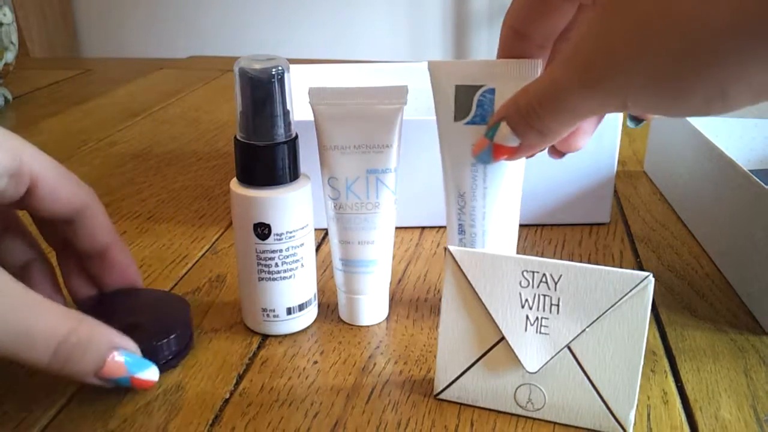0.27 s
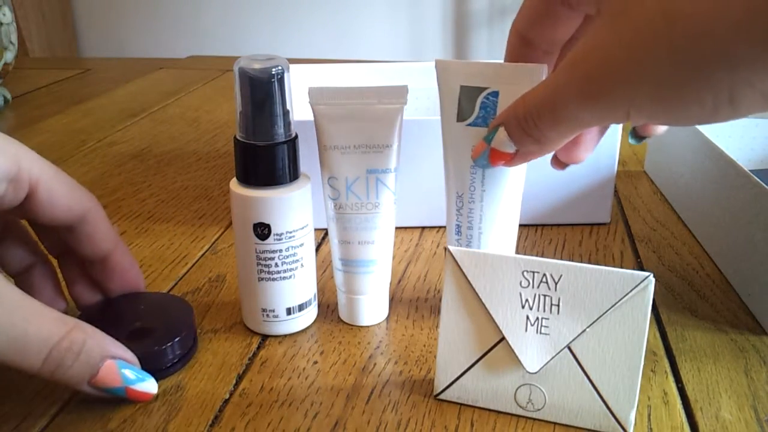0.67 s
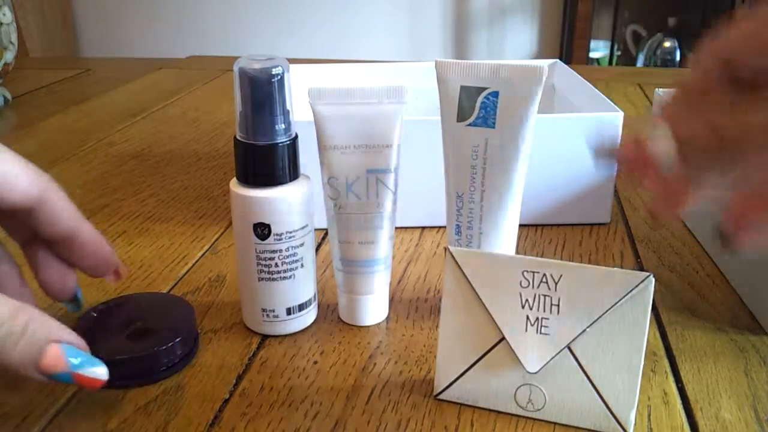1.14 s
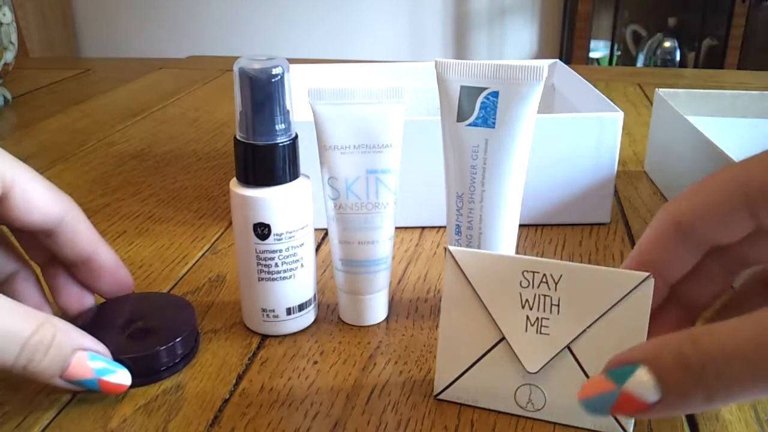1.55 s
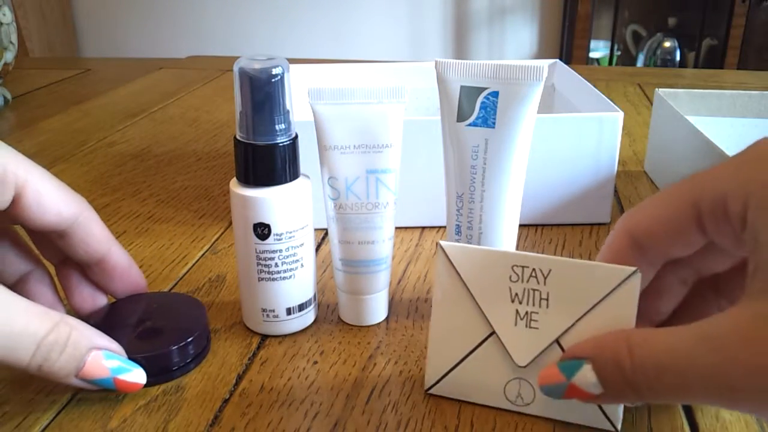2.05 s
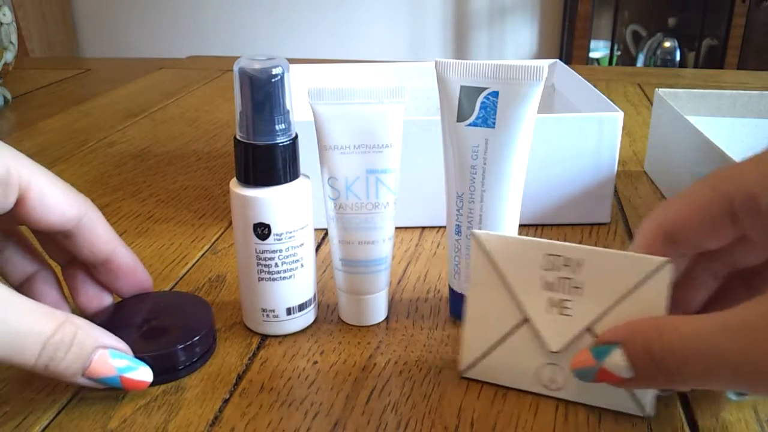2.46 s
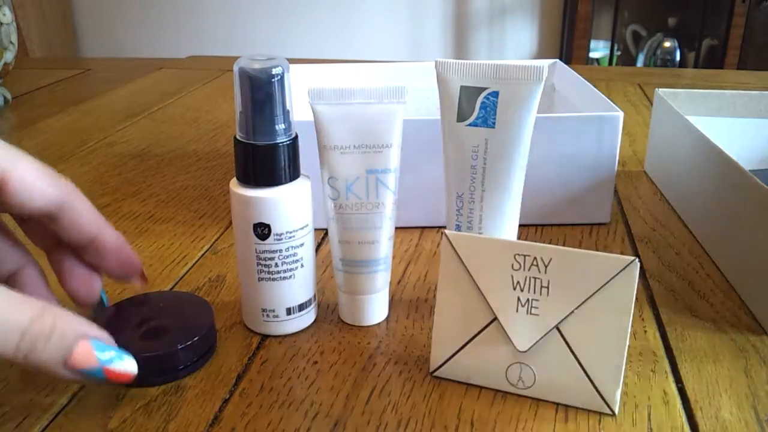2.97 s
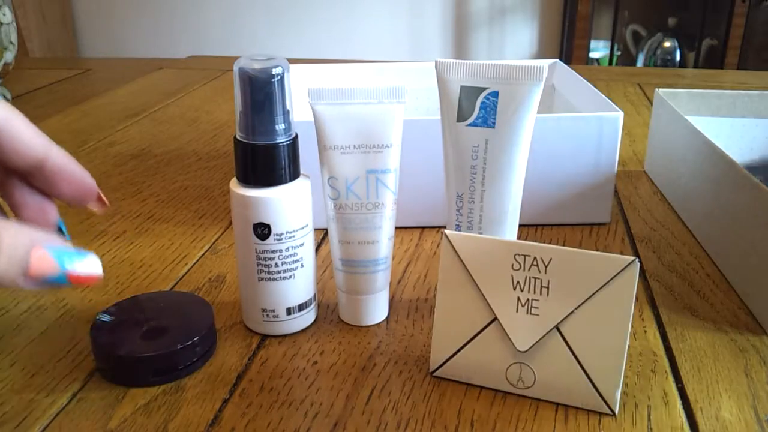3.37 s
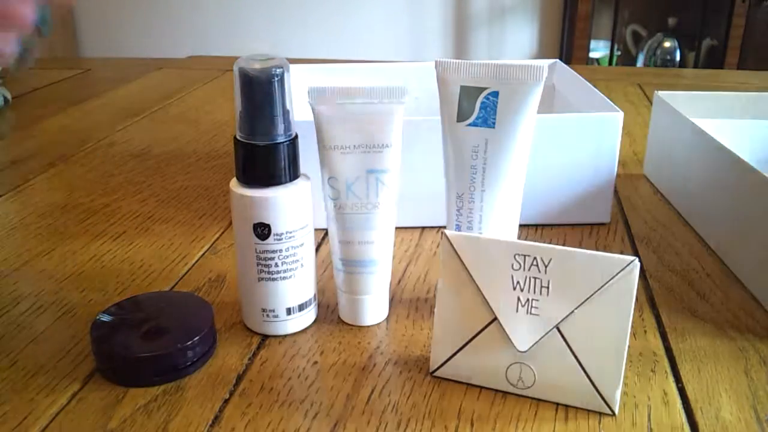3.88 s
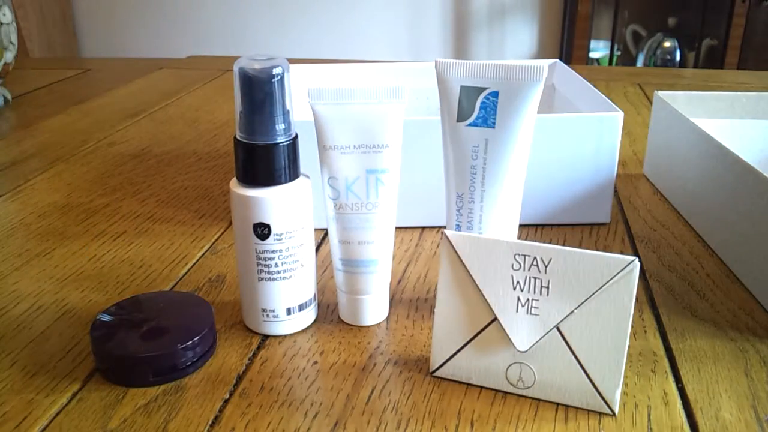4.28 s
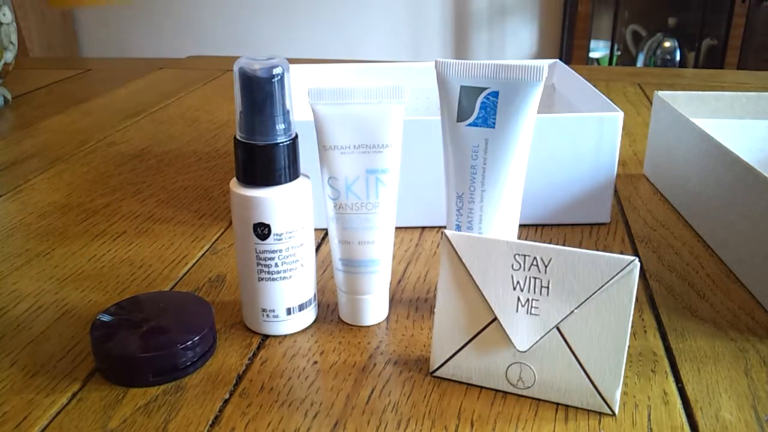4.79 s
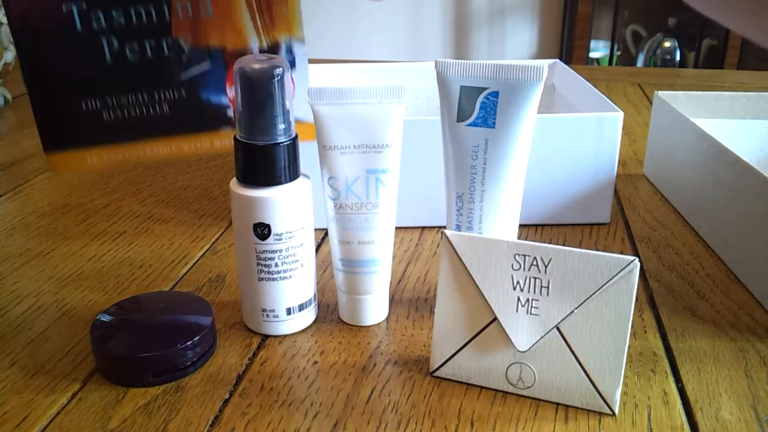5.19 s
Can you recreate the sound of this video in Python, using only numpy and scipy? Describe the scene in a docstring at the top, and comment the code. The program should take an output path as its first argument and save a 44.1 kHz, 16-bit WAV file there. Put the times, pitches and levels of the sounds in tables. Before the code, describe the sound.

Close to the microphone in a small, quiet room, a tube's hard cap clicks once against a wooden table. Very soft finger rubbing and the slight scrape of a card packet come next. Hollow cardboard knocks and sliding build to a sharp clack, the loudest moment, as a book is taken from a box. Light ticks and faintly squeaky rubs on the cover end it, over steady low air noise and hiss.

```python
"""A plastic tube is tapped down on a wooden table, its cap ringing briefly in a small, quiet room.
Fingers brush over cosmetics and a card packet is shifted. Then a book is fetched from a cardboard box
with hollow knocks, sliding, faint squeaks and one hard clack that makes the camera's limiter dip.
Each hit is a few dying tones plus a burst of noise; each slide is thousands of tiny slips.
A low murmur of air and a thin hiss lie under it all."""
import sys
import numpy as np
from scipy import signal
from scipy.fft import rfft, irfft
from scipy.io import wavfile
from scipy.ndimage import uniform_filter1d

SR = 44100
rng = np.random.default_rng(int(sys.argv[2]) if len(sys.argv) > 2 else 0)


def wav_record(signal):
    """Record a signal, one row per channel, as 16-bit PCM in the file named by sys.argv[1]."""
    frames = np.transpose(np.atleast_2d(signal))
    bounded = np.clip(frames, -1, 1)
    # unit amplitude maps onto the largest positive 16-bit level
    quanta = np.round(bounded * 32767).astype(np.int16)
    wavfile.write(sys.argv[1], SR, quanta)


N = 240034

# the room's murmur and hiss on each side: (frequency [Hz], level [dB])
AIR_LEFT = [(20, -41), (60, -11.5), (120, -8), (165, 1.5), (280, 4), (450, -7.5), (750, -13), (1400, -15.5),
            (2600, -17.5), (6200, -23.5), (9000, -19.5), (12000, -14.5), (14400, -23.5)]
AIR_RIGHT = [(20, -16), (60, -22.5), (120, -12.5), (170, -6), (300, -4), (650, -10), (1400, -12.5),
             (2600, -15), (4700, -16.5), (5500, -11.5), (9000, -16), (12000, -12.5), (14400, -18.5)]
# how alike that noise is on the two sides: (frequency [Hz], likeness [0-1])
AIR_LIKENESS = [(60, 0.03), (130, 0.24), (290, 0.82), (640, 0), (1400, 0.23), (3100, 0.016)]
# how long the room rings: (frequency [Hz], time to fade by 60 dB [s])
ROOM_FADE = [(200, 0.34), (500, 0.15), (2000, 0.34), (5000, 0.32), (12000, 0.29)]
# echoes from nearby boxes and walls: (delay [s], level [dB])
NEAR_ECHOES = [(.0011, -63), (.0024, -26.5), (.0085, -29), (0.0119, -20.5), (0.0149, -20)]
# what each kind of source sends into the room: (frequency [Hz], level [dB])
RUB_TO_ROOM = [(1000, -8), (12000, -7.5)]
TICK_TO_ROOM = [(2000, -5.5), (4500, -12), (12000, 0)]
KNOCK_TO_ROOM = [(400, -5.5), (1300, -6), (4000, 0), (12000, -11)]
TAP_TO_ROOM = [(300, -5), (1100, 1), (1500, -3.5), (2100, -6), (3000, -11), (3700, -14), (5000, -13),
               (6200, -2), (8000, -7), (12000, -9)]
CLACK_TO_ROOM = [(1000, -9.5), (1650, -7.5), (2250, -14), (2900, -9.5), (3550, -13), (4100, -6),
                 (5000, -14), (6500, -17), (12000, -15)]
# each microphone's tone for direct sound and for sound from all sides: (frequency [Hz], level [dB])
MIC_DIRECT_LEFT = [(100, -7), (400, 3.5), (700, -0.5), (2200, 2), (3400, -4.5), (4600, -6.5), (5700, -23),
                   (7200, -5), (9500, -1), (11600, 7.5), (14500, -1)]
MIC_DIRECT_RIGHT = [(100, -8.5), (400, -2.5), (700, 1.5), (2200, 3), (3400, 1), (4500, 3.5), (5050, 9),
                    (5700, 5.5), (6500, 3.5), (9000, -3), (11600, -9.5), (14500, -8)]
MIC_ROOM_LEFT = [(100, -11), (400, 10.5), (700, -3), (2200, 3), (3400, -2), (4600, -10.5), (5900, -10),
                 (7200, -4.5), (9500, -1.5), (11600, 9), (14500, -1)]
MIC_ROOM_RIGHT = [(100, -5.5), (400, 0), (2200, 4), (4000, 4.5), (5050, 5), (5700, 6.5), (6500, -4.5),
                  (9000, 1), (11600, -4), (14500, -8)]
# how far the right microphone trails the left: (frequency [Hz], phase lag [rad])
RIGHT_LAG = [(100, 2.57), (300, 2.69), (1000, 2.15), (2200, 1.78), (5000, 2.08), (14000, 3.05)]

# fingers on the tube and on the packet, packet on the table, hand on the book's cover:
# (start [s], rise [s], fall [s], scrape level [dB], hiss over the scrape [dB])
TUBE_RUBS = [(.8, 0.23, 0.22, -64, 1), (1.05, 0.23, 0.21, -62, -26)]
FINGER_RUBS = [(1.95, 0.33, 0.28, -62.5, -20)]
PACKET_RUBS = [(2.37, .13, 0.16, -49.5, -9)]
COVER_RUBS = [(4.375, 0.03, 0.07, -52, 4.5), (4.44, 0.056, 0.14, -61.5, 10), (4.52, .13, 0.054, -52, 7.5),
              (4.66, 0.14, .3, -55, -18)]
# same columns: the book sliding in its box and, at 3.483 s, the clack's noisy tail dying away in the room
BOOK_RUBS_AND_CLACK_TAIL = [(3.25, 0.16, 0.24, -38.5, -2.5), (3.46, 0.043, 0.14, -28, 5.5),
                            (3.483, .006, 0.069, -21, 3), (3.55, 0.045, 0.073, -44, 5.5),
                            (3.66, 0.075, 0.026, -46, 6), (3.72, 0.15, .6, -56, -2)]
# the pitch ranges that each of those sounds brings out: (frequency [Hz], width [Hz], level [dB])
TUBE_BANDS = [(1400, 500, -5), (2980, 240, -5)]
FINGER_BANDS = [(5700, 560, -9), (6600, 480, -5), (7800, 400, 5)]
PACKET_BANDS = [(330, 150, -7), (517, 220, 1), (900, 330, -2), (1940, 240, -7.5), (2960, 1800, -9),
                (4960, 300, -8)]
COVER_BANDS = [(1570, 360, -2), (2000, 1100, 3.5), (3220, 800, 5), (3750, 340, 2)]
BOOK_BANDS = [(1050, 300, -33), (1270, 1030, 8), (2500, 900, -21), (3280, 1140, 10)]
# the hiss of slipping fibres: (frequency [Hz], level [dB])
RUB_HISS = [(1500, -39.5), (3200, 10.5), (5000, 4.5), (7000, 3.5), (9500, 1), (12500, 3), (14500, -2),
            (16000, -2)]
# glossy card singing as it slips:
# (start [s], rise [s], fall [s], level [dB], starting pitch [Hz], glide [Hz/s], width [Hz])
COVER_SQUEAKS = [ (3.321, 0.015, 0.035, -46, 4270, -3000, 220), (4.52, 0.16, 0.16, -57, 3090, 546, 95),
                 (4.56, .07, .05, -62, 5150, 900, 190)]

# the natural tones of the cardboard, the table top, the tube's cap and the hard edge that clacks:
# (frequency [Hz], level [dB], time to fade by 60 dB [s])
CARD_TONES = [(722, -2, 0.034), (962, 7, 0.016), (1096, 2.5, 0.025), (1320, 4.5, 0.018), (1596, -6, 0.021),
              (1874, -3, 0.015), (2460, -28, 0.031)]
TABLE_TONES = [(251, -17.5, 0.12), (338.5, -2, 0.042), (419, 4, 0.028), (543, 7, 0.02), (618, -14, 0.063)]
CAP_TONES = [(343, -16, 0.032), (678, -7.5, 0.037), (1000, -2.5, 0.016), (1400, -1, 0.0091),
             (1950, -1, 0.011), (2320, 1.5, 0.016), (2910, -0.5, 0.014), (3770, 8.5, 0.009),
             (4670, 4, 0.0099), (5320, 5.5, 0.0074), (7750, 1, 0.0062), (11260, -1, 0.0053)]
EDGE_TONES = [(970, -13, 0.019), (1210, -21, 0.013), (2238, -4, 0.019), (2965, -9, 0.01),
              (3450, -5, 0.0081), (4850, 3, 0.0066), (5630, -2.5, 0.0081)]
# nails and edges catching: (time [s], level [dB], pitch [Hz], pitched share [0-1], contact time [s])
NAIL_TICKS = [ (0.256, -52, 2300, 0.3, .0005), (2.753, -53, 2770, .85, .0003),
              (3.238, -35, 2290, 0.2, 0.00018), (3.278, -43, 2250, 0.06, 0.00045),
              (3.407, -37.5, 6360, 0.9, 0.0012), (3.435, -37.5, 5650, 0.96, 0.0008),
              (3.895, -43, 4080, 0.8, 0.0002), (3.911, -55.5, 4200, 0.1, 0.00022),
              (4.387, -47, 1630, 0.34, 0.00061), (4.420, -43, 4840, 0.2, 0.0002),
              (4.496, -48, 5360, 0.6, 0.00037), (4.616, -50.5, 5760, .3, 0.0012)]
# blunt knocks of card and book and, at 0.332 s, a low room boom just after the tube's tap:
# (time [s], card level [dB], low thud over the card [dB], thud pitch [ratio], contact time [s])
KNOCKS_AND_BOOM = [ (0.256, -54.5, -1, 0.92, .001), (0.332, -56, 16.5, 0.84, 0.0028),
                   (2.37, -49, 5, 0.97, 0.00079), (2.555, -53.5, 3, 1.2, 0.00082),
                   (2.753, -54, -1, 1.06, 0.0009), (3.215, -29.5, -14, 0.9, 0.0014),
                   (3.245, -48.5, 7, 0.78, 0.0044), (3.257, -45.5, 6, .93, 0.001),
                   (3.279, -50.5, 10, 0.75, .003), (3.371, -27.5, -0.5, 1.02, 0.002),
                   (3.384, -37.5, -4, 0.96, 0.00072), (3.465, -32.5, -8, 1.06, 0.0013),
                   (3.720, -32, 0.5, 1.26, 0.0072), (3.730, -37.5, 1, 1.07, .001),
                   (3.750, -53, -2.5, 0.77, 0.0007), (4.083, -55.5, 1, 1.2, 0.0094)]


def amp(db):
    """Turns decibels into a number to multiply by."""
    return 10 ** (np.asarray(db) / 20)


def unit(x):
    """Scales a sound to an average strength (rms) of one."""
    return x / np.sqrt(np.mean(x ** 2) + 1e-20)


def unit_hit(x):
    """Gives a hit the same energy as 10 ms of sound at an rms of one."""
    return x * np.sqrt(.01 * SR / np.sum(x ** 2))


def look_up(points, hz):
    """Reads between the rows of a table, with every octave equally wide."""
    table_hz, value = np.transpose(points)
    return np.interp(np.log(hz + 1), np.log(table_hz + 1), value)


def add(mix, time_s, sound):
    """Mixes a sound in at the given time."""
    part = mix[:, round(time_s * SR):][:, :sound.shape[-1]]
    part += sound[..., :part.shape[1]]


def panned(sound, pan_db):
    """Makes a sound pan_db louder on the left than on the right."""
    return sound * amp([[pan_db / 2], [-pan_db / 2]])


def colour(x, points, size=2048):
    """Shapes a sound's tone by a table, without smearing it earlier in time."""
    log_gain = np.log(amp(look_up(points, abs(np.fft.fftfreq(size, 1 / SR)))))
    taps = np.fft.ifft(np.exp(np.conj(signal.hilbert(log_gain)))).real
    return signal.oaconvolve(x, taps[:size // 2])[:len(x)]


def room_air():
    """The room's air murmurs low, with a thin steady hiss on top."""
    hz = np.fft.rfftfreq(N, 1 / SR)
    shared, separate = rfft(rng.standard_normal((2, N)))
    likeness = np.clip(look_up(AIR_LIKENESS, hz), 0, 1)
    blend = likeness * shared + np.sqrt(1 - likeness ** 2) * separate
    left = irfft(shared * amp(look_up(AIR_LEFT, hz)), N)
    right = irfft(blend * amp(look_up(AIR_RIGHT, hz)), N)
    return amp(-36) * np.array([left, right])


def microphones(x, left, right):
    """Each microphone opening gives its side a tone of its own."""
    return np.array([colour(x[0], left), colour(x[1], right)])


def room(x, to_room, build_s=0.006):
    """A sound arrives directly, then as a few near echoes, then as a fading wash from all sides."""
    near = x.copy()
    for delay_s, db in NEAR_ECHOES:
        add(near, delay_s, amp(db) * x)
    hz, t, noise = signal.stft(rng.standard_normal((2, SR)), SR, nperseg=256)
    fade = amp(-60 * t / look_up(ROOM_FADE, hz)[:, None])
    wash = signal.istft(noise * fade, SR, nperseg=256)[1]
    wash *= 1 - np.exp(-(np.arange(wash.shape[1]) / SR / build_s) ** 2)  # echoes take time to pile up
    wash /= np.linalg.norm(wash[0])
    wash = microphones([colour(side, to_room) for side in wash], MIC_ROOM_LEFT, MIC_ROOM_RIGHT)
    near = microphones(near, MIC_DIRECT_LEFT, MIC_DIRECT_RIGHT)
    return near + signal.fftconvolve(x, wash, axes=1)[:, :N]


def swell(start_s, rise_s, fall_s, db):
    """Loudness of one stroke or tail: it rises smoothly, then loses 20 dB in the fall time."""
    braking = 1.21  # above 1, the sound holds longer and stops harder
    t = np.arange(N) / SR - start_s
    rise = np.sin(np.pi / 2 * np.clip(t / rise_s, 0, 1)) ** 2
    return rise * amp(db - 20 * (np.maximum(t - rise_s, 0) / fall_s) ** braking)


def rub(strokes, bands, uneven_db, slips_per_s, pan_db):
    """Fibres catch and slip: a stream of tiny clicks hisses and sounds the object underneath."""
    hz = np.fft.rfftfreq(N, 1 / SR)
    slip_size = amp(uneven_db * np.minimum(rng.exponential(1, N), 4))
    slips = slip_size * rng.standard_normal(N) * (rng.random(N) < slips_per_s / SR)
    body = sum(amp(db) / (1 + 1j * (hz ** 2 - centre ** 2) / (width * hz + 1e-9))
               for centre, width, db in bands)
    scrape = unit(irfft(rfft(slips) * body, N))
    hiss = unit(colour(slips, RUB_HISS))
    sound = sum(swell(*stroke) * (scrape + amp(hiss_db) * hiss) for *stroke, hiss_db in strokes)
    return panned(sound, pan_db)


def squeaks():
    """The book's glossy cover sings as it slips: faint, fuzzy notes that drift in pitch."""
    t, offset_hz = np.arange(N) / SR, np.fft.rfftfreq(N, 1 / SR)
    out = np.zeros(N)
    for start_s, rise_s, fall_s, db, hz, glide, width_hz in COVER_SQUEAKS:
        narrow_band = np.exp(-(offset_hz / width_hz) ** 2 / 2)
        fuzz = irfft(rfft(rng.standard_normal((2, N))) * narrow_band, N)
        phase = 2 * np.pi * np.cumsum(hz + glide * np.clip(t - start_s, 0, 1)) / SR
        note = unit(fuzz[0] * np.cos(phase) + fuzz[1] * np.sin(phase))
        out += note * swell(start_s, rise_s, fall_s, db)
    return panned(out, pan_db=-1)


def ring(tones, scatter=0., contact_s=0.000095, alternate=True, size=8192):
    """A struck object's tones die away; where it is hit shifts them, and a soft hit slows their rise."""
    t = np.arange(size) / SR
    hz, db, fade_s = np.transpose(tones)[:, :, None]
    detune, strength = scatter * rng.standard_normal((2, len(tones), 1))
    sign = (-1) ** np.arange(len(tones))[:, None] if alternate else 1  # flips every second tone
    loudness = (1 + 6 * strength) * amp(db - 60 * t / fade_s)
    waves = sign * loudness * np.sin(2 * np.pi * hz * (1 + detune) * t)
    return unit_hit(waves.sum(0) * (1 - np.exp(-t / contact_s)))


def crack(low_hz, high_hz, fade_s, size=8192):
    """A hit's crowded overtones blur into a burst of noise that loses 60 dB in fade_s."""
    burst = rng.standard_normal(size) * amp(-60 * np.arange(size) / SR / fade_s)
    band = signal.butter(2, [low_hz, min(high_hz, .45 * SR)], "band", fs=SR, output="sos")
    return unit_hit(signal.sosfilt(band, burst))


def hit(card_db, thud_db, click_db, click_hz, pitched, contact_s, thud_ratio=1):
    """A hit clicks, rings the hollow card and thuds into the table; soft hits scuff for longer."""
    card = amp(card_db) * ring(CARD_TONES, scatter=0.023, contact_s=contact_s, alternate=False)
    thud_tones = np.multiply(TABLE_TONES, [thud_ratio, 1, 1])
    thud = amp(thud_db) * ring(thud_tones, scatter=0.052, contact_s=contact_s, alternate=False)
    scuff_s = 0.011 + 6 * contact_s
    ping = np.sqrt(pitched) * crack(.935 * click_hz, 1.065 * click_hz, scuff_s)
    scuff = np.sqrt(1 - pitched) * crack(1530, 5040, scuff_s)
    fizz = amp(-8.5) * crack(6100, 12900, scuff_s)
    click = amp(click_db) * (ping + scuff + fizz)
    return panned(card, pan_db=2) + panned(thud, pan_db=0.5) + panned(click, pan_db=0)


def ticks():
    """Nails and edges are mostly click and barely stir the card and the table."""
    out = np.zeros((2, N))
    for time_s, db, hz, pitched, contact_s in NAIL_TICKS:
        tick = hit(card_db=db - 17, thud_db=db - 13, click_db=db,
                   click_hz=hz, pitched=pitched, contact_s=contact_s)
        add(out, time_s, tick)
    return out


def knocks_and_boom():
    """Blunt knocks and one room boom are mostly low tones; the longer a contact, the weaker its click."""
    firm_contact_s, loss_per_doubling_db = 0.00089, 7
    out = np.zeros((2, N))
    for time_s, db, thud_db, thud_ratio, contact_s in KNOCKS_AND_BOOM:
        click_db = db - 4.5 - loss_per_doubling_db * np.log2(contact_s / firm_contact_s)
        sound = hit(db, db + thud_db, click_db, click_hz=4680, pitched=0.033,
                    contact_s=contact_s, thud_ratio=thud_ratio)
        add(out, time_s, sound)
    return out


def tube_tap():
    """The tube's hard cap meets the wood with a crisp, ringing crack; a soft echo near 2 kHz follows."""
    out = np.zeros((2, N))
    crisp = amp(-33) * crack(1860, 5300, fade_s=0.017) + amp(-35.5) * crack(4400, 12600, fade_s=0.015)
    add(out, .2977, panned(amp(-29.5) * ring(CAP_TONES) + crisp, pan_db=2.5))
    add(out, .312, panned(amp(-44) * crack(1700, 2150, fade_s=0.013), pan_db=9))
    return out


def clack_overload_pop():
    """A short, dry low pop as the clack overloads the recorder."""
    out = np.zeros((2, N))
    add(out, 3.4807, amp(-32) * crack(21, 530, fade_s=0.0034))
    return out


def clack():
    """A hard edge catches with a small tick, then snaps down; it is too small to give off bass."""
    out = np.zeros((2, N))
    snap = amp(2.5) * ring(EDGE_TONES)
    snap += amp(-2) * crack(1650, 6700, fade_s=0.039) + amp(-4.5) * crack(10000, 15500, fade_s=0.027)
    snap = signal.sosfilt(signal.butter(4, 800, "high", fs=SR, output="sos"), snap)
    add(out, 3.4785, amp(-25) * crack(5060, 5620, fade_s=0.0075))
    add(out, 3.4804, panned(snap, pan_db=5))
    return out


def scene():
    """Rubs and hits sound in the room and reach the two microphones, over the murmur of the air."""
    rubs = rub(PACKET_RUBS, PACKET_BANDS, uneven_db=2.5, slips_per_s=3400, pan_db=3)
    rubs += rub(FINGER_RUBS, FINGER_BANDS, uneven_db=6.5, slips_per_s=3200, pan_db=-9.5)
    rubs += rub(BOOK_RUBS_AND_CLACK_TAIL, BOOK_BANDS, uneven_db=1, slips_per_s=7700, pan_db=3)
    rubs += rub(COVER_RUBS, COVER_BANDS, uneven_db=0, slips_per_s=4300, pan_db=4.5)
    rubs += rub(TUBE_RUBS, TUBE_BANDS, uneven_db=-3, slips_per_s=8200, pan_db=5.5)
    mix = room(tube_tap(), TAP_TO_ROOM, build_s=0.009)
    mix += room(clack(), CLACK_TO_ROOM, build_s=0.007)
    mix += room(knocks_and_boom(), KNOCK_TO_ROOM)
    mix += room(ticks(), TICK_TO_ROOM)
    mix += room(rubs + squeaks(), RUB_TO_ROOM)
    return mix + clack_overload_pop() + room_air()


def record(dry):
    """The right side lags; a limiter briefly turns overloads down; peaks clip; the top treble is cut."""
    ceiling_db, recovery_db_per_s, cutoff_hz = 2, 90, 14750
    lag = np.exp(-1j * look_up(RIGHT_LAG, np.fft.rfftfreq(N, 1 / SR)))
    x = np.array([dry[0], irfft(rfft(dry[1]) * lag, N)])
    over_db = np.maximum(20 * np.log10(abs(x).max(0) + 1e-9) - ceiling_db, 0)
    recovery_db = np.arange(N) / SR * recovery_db_per_s
    dip_db = np.maximum.accumulate(over_db + recovery_db) - recovery_db  # dips at once, climbs back
    dip_db = uniform_filter1d(dip_db, size=24)
    x = np.clip(x * amp(-dip_db), -.94, .94)
    treble_cut = signal.firwin(401, cutoff_hz, window=("kaiser", 9), fs=SR)
    return signal.oaconvolve(x, treble_cut[None], "same", axes=1)


dry = scene()
out = record(dry)
wav_record(out)
```